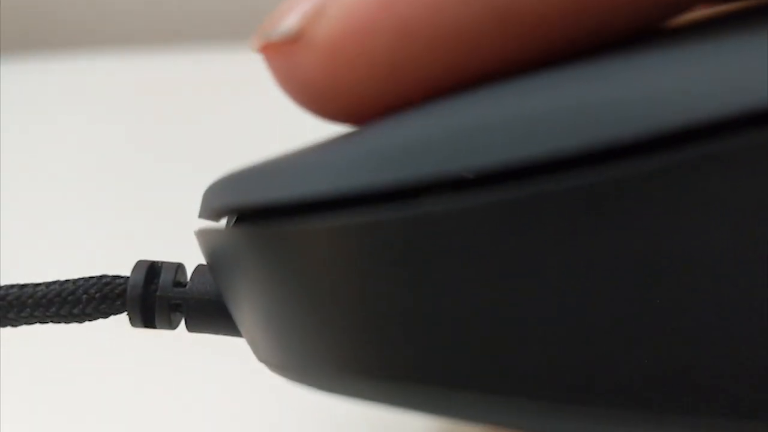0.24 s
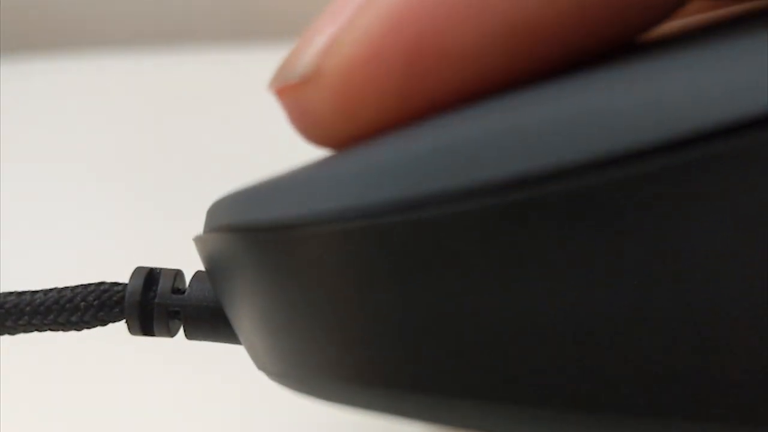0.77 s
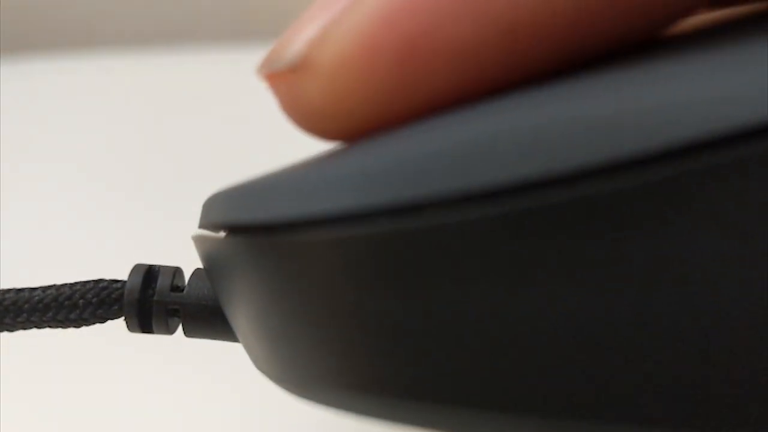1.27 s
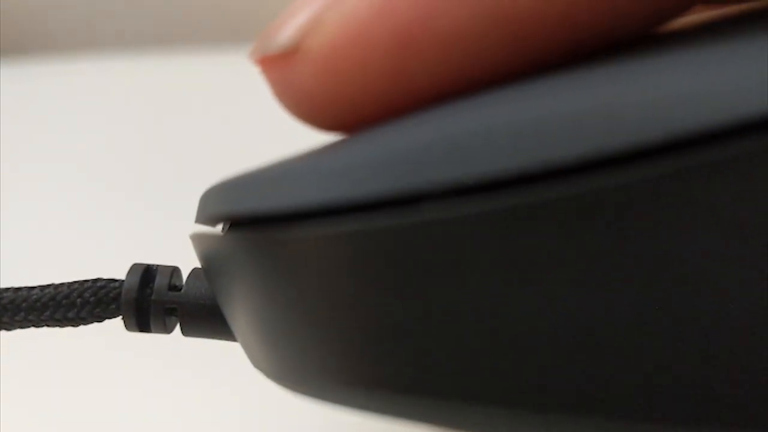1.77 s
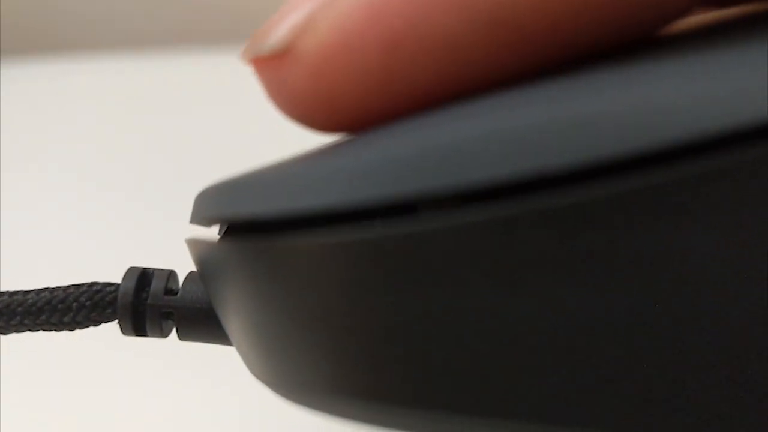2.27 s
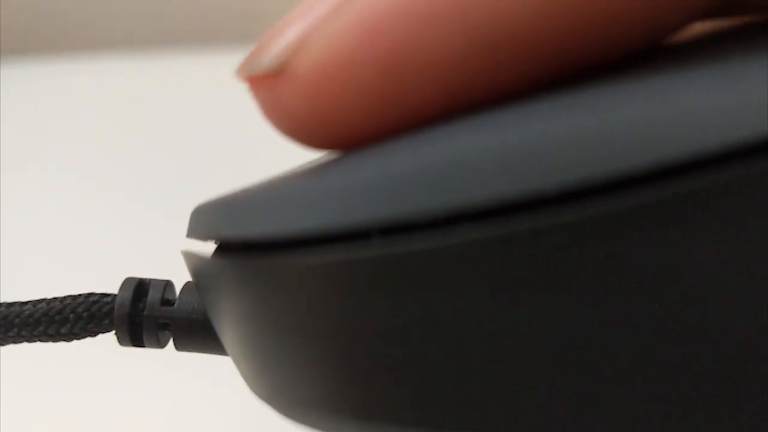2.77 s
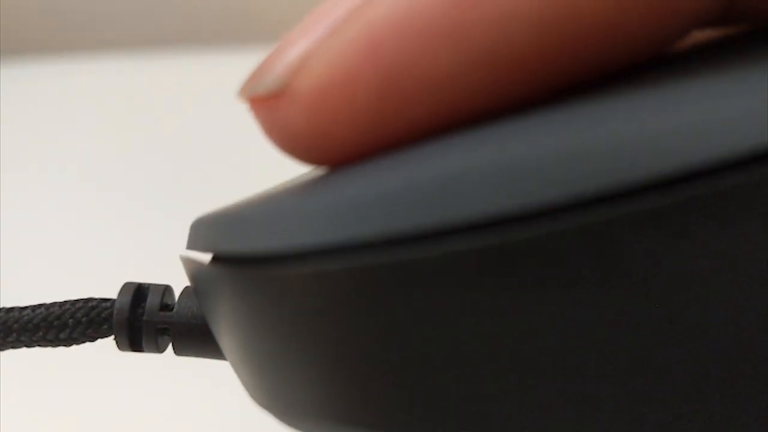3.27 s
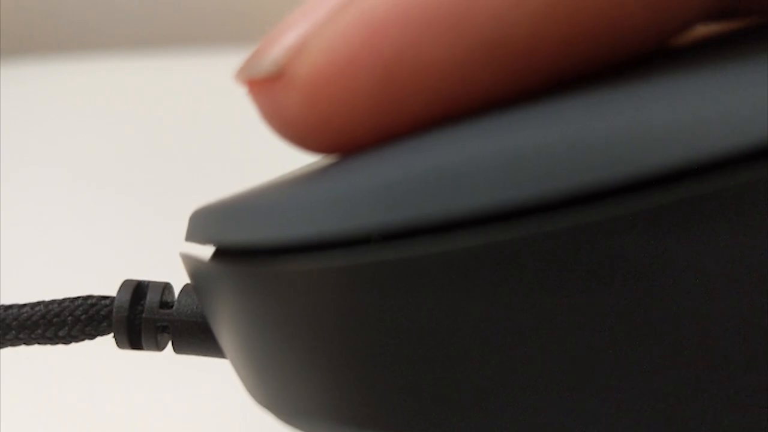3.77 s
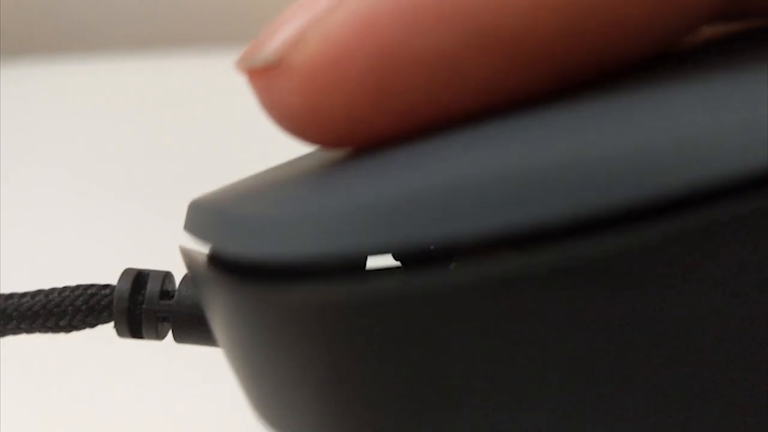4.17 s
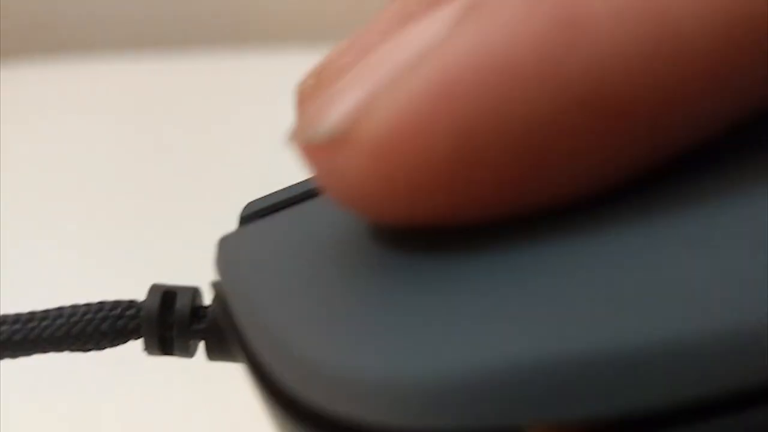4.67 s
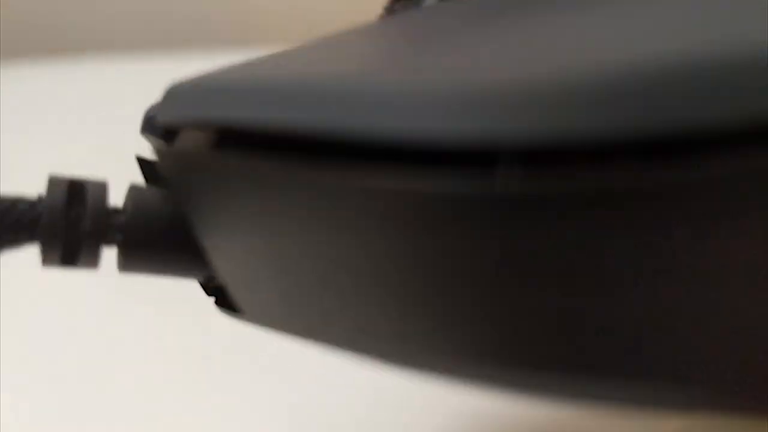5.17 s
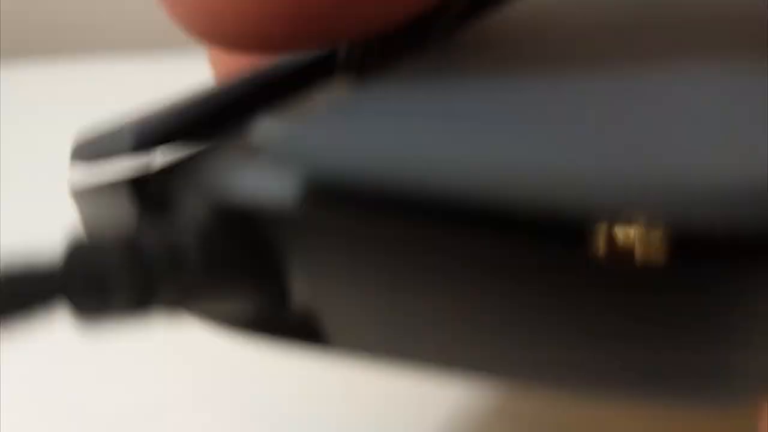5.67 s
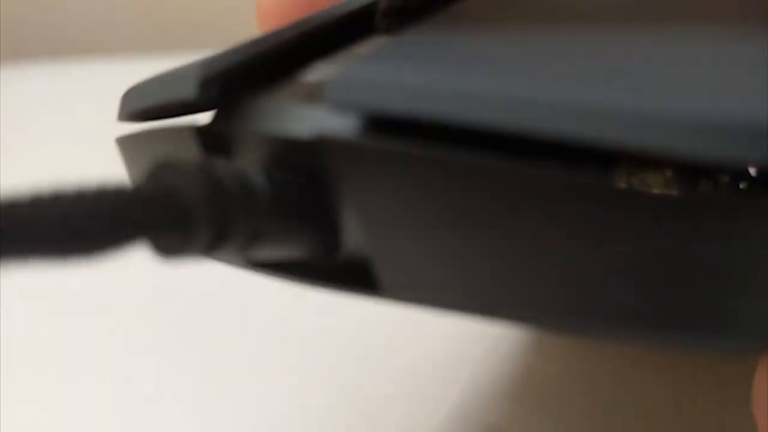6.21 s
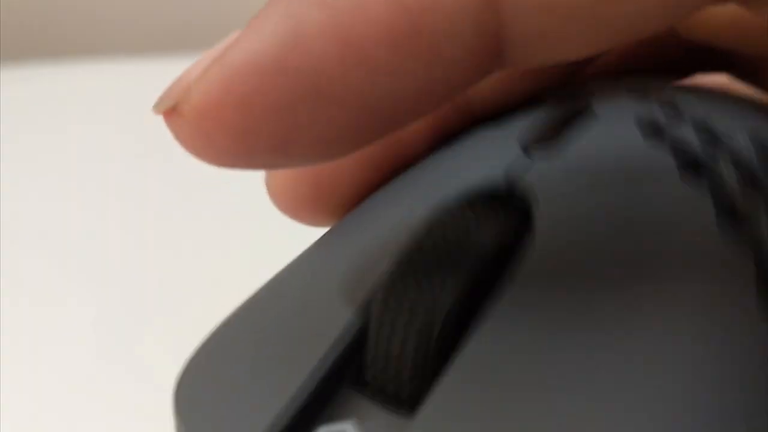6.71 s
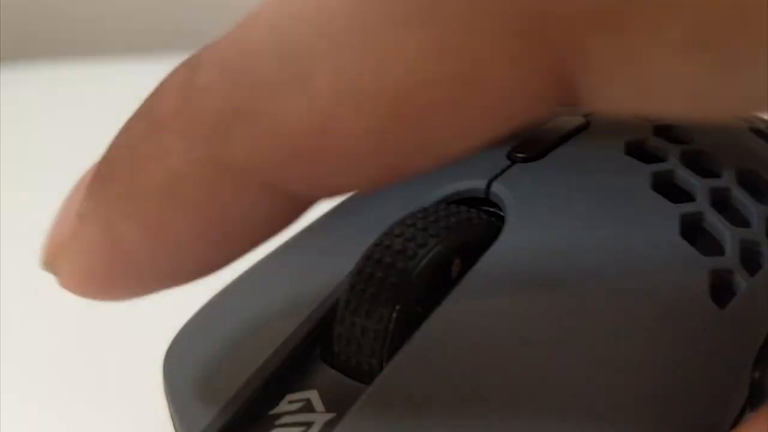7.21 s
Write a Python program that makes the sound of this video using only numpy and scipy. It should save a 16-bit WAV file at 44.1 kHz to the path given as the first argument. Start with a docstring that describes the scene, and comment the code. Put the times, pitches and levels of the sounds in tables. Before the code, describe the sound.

Close, dry mouse clicks in a quiet small room, followed by light plastic rattling, soft rubbing and several hard knocks on a desk.

```python
"""A light plastic computer mouse clicks and knocks close to a phone, on a desk in a small room.
Its button is pressed and let go four times: damped modes and noise ticks make the snaps and landings.
Then the hand turns the mouse: loose buttons rattle and the shell knocks on the desk, again as struck modes.
Skin and feet rub as coloured noise in strokes; a faint whistle arches in pitch near the end.
Reflections follow the blows, over soft room noise with a wavering hum."""
import sys
import numpy as np
from scipy import signal
from scipy.fft import rfft, irfft
from scipy.io import wavfile

SR = 44100
rng = np.random.default_rng(int(sys.argv[2]) if len(sys.argv) > 2 else 0)


def dump_mix(stems):
    """Bounce the given channels to the path in sys.argv[1] as a 16-bit WAV at rate SR."""
    frames = np.atleast_2d(stems).T  # one column per channel
    limited = np.clip(frames, -1, 1)  # hard clip at full scale
    pcm = np.round(limited * 32767).astype(np.int16)
    wavfile.write(sys.argv[1], SR, pcm)


N = 328545
T = np.arange(N) / SR  # time axis of the whole scene [s]
RING = T[:SR]  # one second, for single sounds

# button down: (snap time [s], landing time [s], landing level [dB], landing brightness [dB/octave])
PRESSES = [(.4175, .4204, -26.5, 4), (1.9406, 1.9441, -26.5, -1), (3.1087, 3.1137, -34, -5),
           (3.9703, 3.9745, -30.5, 3)]
# button up: (snap time [s])
RELEASES = [1.4614, 2.249, 3.7242, 4.2393]
SNAP_DOWN_DB, SNAP_UP_DB = -29.5, -26.5  # the spring snaps with the same force every time
# loose buttons jostled: (time [s], button ring level [dB], edge tick level [dB], button pitch [ratio])
RATTLES = [(4.363, -36.5, -58, 1.09), (4.3713, -32, -46.5, 0.96), (4.3798, -27, -59, 1.12),
           (4.385, -38, -57, 1.06), (4.411, -51, -48.5, 0.69), (4.569, -48.5, -56, 1.2),
           (4.760, -45.5, -73, 0.92), (4.821, -50.5, -59, 1.43), (4.845, -45, -69, 1.01),
           (4.959, -41, -52, 1.16), (4.967, -30, -36, 0.95), (4.9718, -25.5, -28, 0.92),
           (4.981, -30, -35.5, 0.98), (5.223, -36, -47, 1), (6.298, -48, -44, 1.47),
           (6.3008, -40, -43.5, 1.83), (6.308, -41, -50, 1.6), (6.538, -63, -53.5, 1.3)]
# shell meets desk: (time [s], thump level [dB], thump pitch [ratio], spot along the desk [0-1],
# shell clack level [dB], clack centre [Hz])
KNOCKS = [(5.147, -38.5, 0.4, 0.37, -59, 4030), (5.2629, -6, 1.026, 0.16, -16, 4230),
          (5.2882, -19.5, 1.03, 0.15, -33, 4100), (5.5526, -12, 0.99, 0.06, -25.5, 7560),
          (5.5802, -44, 1.7, 0.05, -46, 5230), (5.6259, -16, 0.78, 0.21, -29.5, 6050),
          (6.3235, -29, 0.66, 0.35, -57, 4000), (6.694, -47, 1.1, 0.2, -61, 4000),
          (6.862, -17, 1.03, 0.42, -28, 3970), (6.8805, -3.5, 1.02, 0.34, -15.5, 5230),
          (6.8857, -30, 0.8, 0.7, -20.5, 8900), (6.926, -26, 0.71, 0.39, -50, 4000)]
EDGE_TICK_DB = -5.5  # the edge tick of a knock, against its clack

# modes of the switch closing: (frequency [Hz], relative level [dB], t60 [s])
SWITCH_DOWN_MODES = [(273, -5, 0.02), (2600, 2.5, 0.0043), (3694, 1.5, 0.0099), (4500, -5.5, 0.013),
                     (5320, -16, 0.013), (6630, -6.5, 0.013), (8000, 0, 0.014), (8270, 5, 0.0078),
                     (9240, 8, 0.0075), (9970, -0.5, 0.0082), (11600, -10, .008), (14000, 1.5, .007),
                     (15000, -7, .005), (15400, -6, 0.0066)]
# modes of the switch opening, which rings differently: (frequency [Hz], relative level [dB], t60 [s])
SWITCH_UP_MODES = [(291, -13, 0.023), (1123, -22, 0.039), (2397, 1.5, 0.0073), (2730, -1, 0.01),
                   (3420, -10.5, 0.01), (4525, -9.5, 0.014), (5170, -7, 0.01), (6250, -9, 0.0077),
                   (6950, 1, 0.0099), (7700, 1.5, 0.0077), (8250, 3, 0.0061), (9510, 1, 0.0092),
                   (10100, 5, 0.0086), (11800, -2, 0.008), (12500, -11, 0.0063), (15200, -11, 0.0083)]
# modes of the button: (frequency [Hz], relative level [dB], t60 [s])
BUTTON_MODES = [(870, -22.5, 0.048), (1153, 2, 0.028), (1238, -12.5, 0.066), (1392, -18, 0.05),
                (2230, -12.5, 0.018), (2580, -2, 0.013), (3780, -12, 0.0057)]
# modes of the hollow shell: (frequency [Hz], relative level [dB], t60 [s])
SHELL_MODES = [(980, 3.5, 0.0091), (1218, -6.5, 0.039), (1447, -2, 0.031), (1950, 0.5, 0.015),
               (2390, 0, 0.0073), (3840, 0, 0.014), (4390, -5, 0.016), (4920, 3, 0.0069),
               (5660, 1.5, 0.0059), (6410, -7.5, 0.0051), (7400, 1, 0.0064), (9320, -2, 0.007)]
# modes of the desk top: (frequency [Hz], relative level [dB], t60 [s])
DESK_MODES = [(73.9, -17.5, 0.56), (141, -15.5, 0.42), (177.3, -13, 0.36), (251, 3.5, 0.078),
              (323, 1, 0.11), (407, -4, 0.05), (454, 0, 0.11), (573.3, -10, 0.11)]

# spectrum of the switch contact's chatter: (frequency [Hz], relative density [dB per Hz])
SNAP_SPECTRUM = [(300, -8.5), (1600, -12), (2600, -9.5), (3300, -16), (4600, -5), (5800, -7), (7000, -3),
                 (10000, -4.5), (11200, -7), (15500, -15), (17000, -27)]
# spectrum of the desk thump at pitch ratio 1: (frequency [Hz], relative density [dB per Hz])
THUMP_SPECTRUM = [(30, -45), (90, -21), (160, -5), (300, 0), (490, -1.5), (630, -12.5), (800, -16),
                  (1500, -38), (4000, -53), (12000, -89)]
# spectrum of hard plastic edges ticking: (frequency [Hz], relative density [dB per Hz])
TICK_SPECTRUM = [(300, -10), (1500, -9.5), (2500, 7), (3200, -3.5), (4500, -10.5), (6200, 4), (7500, -6.5),
                 (10000, -9), (16000, -20.5)]
# spectrum of rubbing: (frequency [Hz], relative density [dB per Hz])
RUB_SPECTRUM = [(200, -8), (800, -8), (1400, -1), (2400, -1), (3500, -7), (5200, -6), (6100, 3), (7200, -2),
                (8500, -6), (11300, -5), (12500, -13), (16000, -18)]
# skin or feet slide, one row per stroke: (fastest time [s], mean level there [dB], length [s])
STROKES = [(1.52, -67.5, 0.65), (3.262, -57.5, 0.19), (4.395, -65, 0.17), (4.86, -55.5, 0.15),
           (5.35, -65, 1), (5.488, -56.5, .16), (5.84, -66, 0.12), (6.474, -75, .25), (6.86, -49.5, 0.15),
           (6.93, -61, 0.24), (7.235, -58.5, .19), (7.337, -60.5, 0.37)]
STROKE_RISE = 0.48  # share of a stroke spent speeding up
STROKE_EDGE_DB, STROKE_ROUNDNESS = 20.5, 1.56  # drop at both ends; exponent of the swell (1 pointed, 2 round)

# arches of a faint thin whistle: (crest time [s], length [s], mean crest pitch [Hz], middle level [dB])
ARCHES = [(6.695, 0.22, 10740, -69), (7.02, 0.26, 9850, -72.5)]
ARCH_SAG, ARCH_FADE_S = .135, 0.018  # share of the pitch lost at both ends; fade in and out

# room reflections: (band centre [Hz], band gain before the send trim [dB], t60 before evening out [s])
ROOM_BANDS = [(90, -3.5, .4), (297, -14.5, 0.15), (1110, -12.5, 0.15), (2770, -16, 0.21), (4500, -15, 0.15),
              (8000, -18, 0.13), (14000, -13, 0.11)]
# spectrum of the room noise: (frequency [Hz], relative density [dB per Hz])
AIR_SPECTRUM = [(15, -30), (25, -7), (37, -22), (53, -11), (75, -3.5), (99, -10.5), (140, -4), (183, -11.5),
                (274, -9.5), (368, -12.5), (598, -11), (1020, -18.5), (1490, -21), (2010, -26),
                (15500, -37.5)]
AIR_DB = -58.5  # room noise level before the offsets below
# offset of the room noise over time: (time [s], level [dB])
AIR_OFFSETS = [(0, 0.93), (4.5, 1.05), (5.8, 3.5), (6.05, -2), (6.4, 1), (7.45, 4.5)]
# hum in the room: (mean frequency [Hz], middle level [dB])
HUM_TONES = [(71, -66.5), (140, -67.5), (1507, -75.5)]
TOP_HZ = 16300  # the phone passes nothing much above this


def undb(db):
    """Decibels to gain."""
    return 10 ** (np.asarray(db) / 20)


def curve(rows):
    """A timed table, joined by straight lines."""
    return np.interp(T, *np.transpose(rows))


def add(track, s, sound):
    """Mix a sound into the track at time s."""
    i = int(s * SR)
    track[i:i + len(sound)] += sound[:N - i]


def blow(x, db):
    """Scale a short sound to its level, with its energy counted over 2 ms."""
    return x * undb(db) * np.sqrt(.002 * SR / np.sum(x ** 2))


def walk(rate):
    """Slow chance with a spread near 1: random points, rate per second, joined by straight lines."""
    return np.interp(T * rate, np.arange(4096), rng.standard_normal(4096))


def fade(t, t60):
    """Exponential decay, 60 dB in t60."""
    return np.exp(-np.log(1000) * t / t60)


def swell(t, rise_s):
    """A blow takes a moment to spread through the part."""
    return 1 - np.exp(-(t / rise_s) ** 2)


def response(points, pitch=1, size=8192):
    """Causal (minimum-phase) impulse response with the given spectrum."""
    hz, db = np.transpose(points)
    f = np.fft.rfftfreq(size, 1 / SR) + 1  # 1 Hz up, to keep the logarithm finite
    level_db = np.interp(np.log(f), np.log(hz * pitch), db)
    cepstrum = irfft(np.log(undb(level_db)))
    # folding the cepstrum forward packs the energy at the start
    cepstrum[1:size // 2] *= 2
    cepstrum[size // 2 + 1:] = 0
    return irfft(np.exp(rfft(cepstrum)))


def colour(x, points):
    """Filter a sound by a spectrum."""
    return signal.fftconvolve(x, response(points))[:len(x)]


def noise(points):
    """Coloured noise of rms 1."""
    x = colour(rng.standard_normal(N), points)
    return x / x.std()


def tilt(modes, db):
    """Mode weights that rise by db per octave: a harder contact is brighter."""
    hz = np.array(modes)[:, 0]
    return undb(db * np.log2(hz / hz[0]))


def ring(modes, rise_s, pitch=1, scatter=0.011, weights=1):
    """Damped modes; each blow lands a little differently, in mode pitches and phases."""
    hz, db, t60 = np.transpose(modes)
    t = RING[:int(t60.max() * SR), None]
    hz = hz * pitch * (1 + scatter * rng.standard_normal(len(hz)))
    phase = rng.uniform(0, 2 * np.pi, len(hz))
    waves = np.sin(2 * np.pi * hz * t + phase)
    return np.sum(weights * undb(db) * fade(t, t60) * waves * swell(t, rise_s), 1)


def tick(spectrum, t60, rise_s=0.000075):
    """Hard edges chatter for a few milliseconds: a coloured, quickly fading noise burst."""
    t = RING[:SR // 20]
    burst = rng.standard_normal(len(t)) * fade(t, t60) * swell(t, rise_s)
    return colour(burst, spectrum)


def clicks():
    """The switch spring snaps over both ways, its contact chatters; going down, the button lands after it."""
    out = np.zeros(N)
    for s, land_s, land_db, bright_db in PRESSES:
        snap = ring(SWITCH_DOWN_MODES, rise_s=0.00072, scatter=0.0072)
        chatter = tick(SNAP_SPECTRUM, t60=0.017, rise_s=0.00099)
        landing = ring(BUTTON_MODES, rise_s=0.0002, weights=tilt(BUTTON_MODES, bright_db))
        add(out, s, blow(snap, SNAP_DOWN_DB))
        add(out, s, blow(chatter, SNAP_DOWN_DB - 5.5))
        add(out, land_s, blow(landing, land_db))
    for s in RELEASES:
        snap = ring(SWITCH_UP_MODES, rise_s=0.0016, scatter=0.017)
        chatter = tick(SNAP_SPECTRUM, t60=0.017, rise_s=0.00088)
        add(out, s, blow(snap, SNAP_UP_DB))
        add(out, s, blow(chatter, SNAP_UP_DB - 4))
    return out


def rattles():
    """Fingers jostle the buttons against the shell; their grip shifts the pitch."""
    out = np.zeros(N)
    for s, ring_db, tick_db, pitch in RATTLES:
        button = ring(BUTTON_MODES, rise_s=0.0013, pitch=pitch, scatter=0.024)
        shell = ring(SHELL_MODES, rise_s=0.00037, scatter=0.056, weights=tilt(SHELL_MODES, db=-8))
        add(out, s, blow(button, ring_db))
        add(out, s, blow(shell, ring_db - 4.0))
        add(out, s, blow(tick(TICK_SPECTRUM, t60=.02), tick_db))
    return out


def clack(centre_hz):
    """The hollow shell rings most around the pitch of the wall that was hit."""
    octaves = np.log2(np.array(SHELL_MODES)[:, 0] / centre_hz)
    boost_db = 7.4 * np.exp(-(octaves / 0.37) ** 2)
    return ring(SHELL_MODES, rise_s=0.0003, scatter=0.053, weights=undb(boost_db))


def knocks():
    """The desk top gives a short thump and rings on; the shell clacks and its loose parts chatter."""
    out = np.zeros(N)
    for s, thump_db, pitch, spot, clack_db, centre_hz in KNOCKS:
        # a mode struck near its node stays quiet
        shapes = np.sin(np.pi * spot * np.arange(1, len(DESK_MODES) + 1))
        ring_db = thump_db - 6.5 + 6 * np.log2(pitch)  # lower bumps set the top ringing less
        add(out, s, -blow(response(THUMP_SPECTRUM, pitch), thump_db))  # the top is pushed away first
        add(out, s, blow(ring(DESK_MODES, rise_s=0.0036, weights=shapes), ring_db))
        add(out, s, blow(clack(centre_hz), clack_db))
        add(out, s, blow(tick(TICK_SPECTRUM, t60=0.021), clack_db + EDGE_TICK_DB))
        # six ever weaker rebounds, about 4 ms apart, losing 0.4 dB per ms
        for late_s in .004 * np.cumsum(rng.uniform(.5, 1.5, size=6)):
            rebound = ring(SHELL_MODES, rise_s=.0002, scatter=0.12, weights=tilt(SHELL_MODES, db=-3.0))
            add(out, s + late_s, blow(rebound, clack_db - 11.5 - 400 * late_s))
    return out


def rubbing():
    """Skin on the shell and feet on the desk slip in tiny uneven steps; each stroke speeds up, then slows."""
    slips = rng.standard_normal(N) * undb(1.8 * walk(rate=370))
    scrape = colour(slips, RUB_SPECTRUM)
    power = np.zeros(N)
    for s, db, length_s in STROKES:
        side_s = length_s * np.where(T < s, STROKE_RISE, 1 - STROKE_RISE)
        drop_db = STROKE_EDGE_DB * np.abs((T - s) / side_s) ** STROKE_ROUNDNESS
        power += undb(db - drop_db) ** 2
    unevenness = undb(1.6 * walk(rate=70))
    return scrape / scrape.std() * np.sqrt(power) * unevenness


def whistle():
    """A very high, faint tone in arches: its pitch rises to a crest and sinks, and it fades at both ends."""
    out = np.zeros(N)
    for s, length_s, crest_hz, db in ARCHES:
        along = np.clip(2 * (T - s) / length_s, -1, 1)  # -1 at the start, 0 at the crest, 1 at the end
        wobble = 1 + 0.00196 * walk(rate=140) + 0.0076 * walk(rate=25)
        hz = crest_hz * (1 - ARCH_SAG * along ** 2) * wobble
        fading = np.minimum((1 - np.abs(along)) * length_s / 2 / ARCH_FADE_S, 1)
        tone = np.sqrt(2) * np.sin(2 * np.pi * np.cumsum(hz) / SR)
        out += tone * fading * undb(db + 2.5 * walk(rate=40))
    return out


def room(x, first_s=.005):
    """Dense reflections from nearby walls build up after a short gap; the bass lingers."""
    centres = np.log([row[0] for row in ROOM_BANDS])
    f = np.log(np.fft.rfftfreq(len(RING), 1 / SR) + 1)
    white = rng.standard_normal(len(RING))
    tail = 0
    for share, (_, db, t60) in zip(np.eye(len(ROOM_BANDS)), ROOM_BANDS):
        arrivals = rfft(white * fade(RING, t60) * swell(RING, rise_s=0.0024))
        even = arrivals / np.abs(arrivals)  # a cluttered room favours no single pitch
        band = irfft(even * np.interp(f, centres, share))  # each band crossfades into its neighbours
        tail = tail + undb(db) * band * (RING < t60)
    out = np.zeros(N)
    add(out, first_s, signal.fftconvolve(x, tail))
    return out


def background():
    """Soft room noise, drifting in level, with a hum that wavers in pitch and level."""
    out = noise(AIR_SPECTRUM) * undb(AIR_DB + curve(AIR_OFFSETS))
    for hz, db in HUM_TONES:
        phase = 2 * np.pi * np.cumsum(hz + 4.54 * walk(rate=20)) / SR
        waver = undb(2.5 * walk(rate=12))
        out += np.sqrt(2) * np.sin(phase) * undb(db) * waver
    return out


def scene():
    """The mouse, the reflections of its blows, the whistle and the quiet room."""
    close = clicks() + rattles()
    desk = knocks()
    reflections = room(close * undb(-1.0) + desk * undb(1.0))  # the desk sends a little more to the room
    return (close + desk + reflections + rubbing() + whistle() + background())[None]


def record(dry):
    """The phone rounds the loudest peaks and cuts the top."""
    rounded = .8 * np.tanh(dry / .8)
    low_pass = signal.ellip(8, .2, 70, TOP_HZ, fs=SR, output="sos")
    return signal.sosfilt(low_pass, rounded)


dry = scene()
out = record(dry)
dump_mix(out)
```